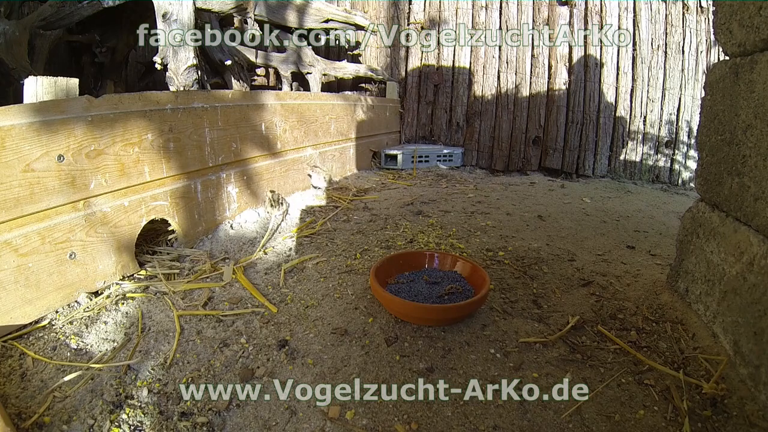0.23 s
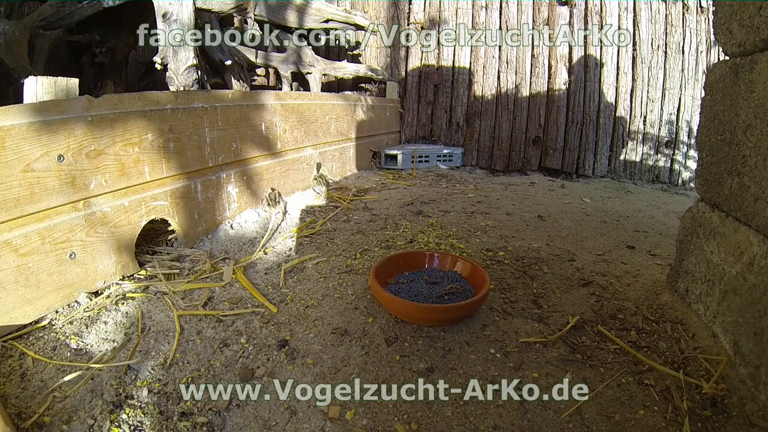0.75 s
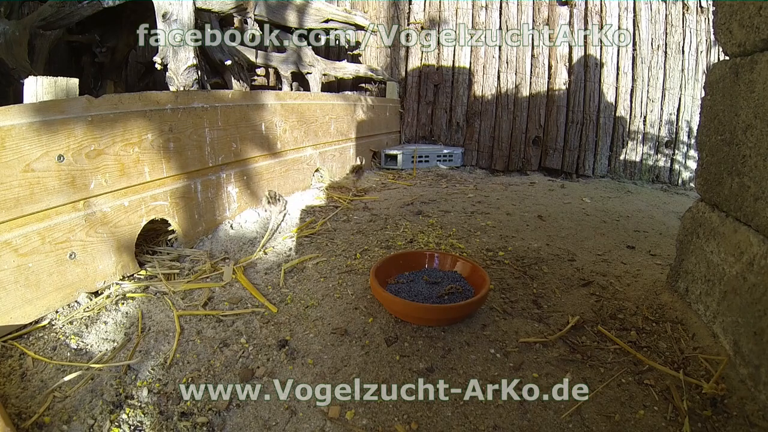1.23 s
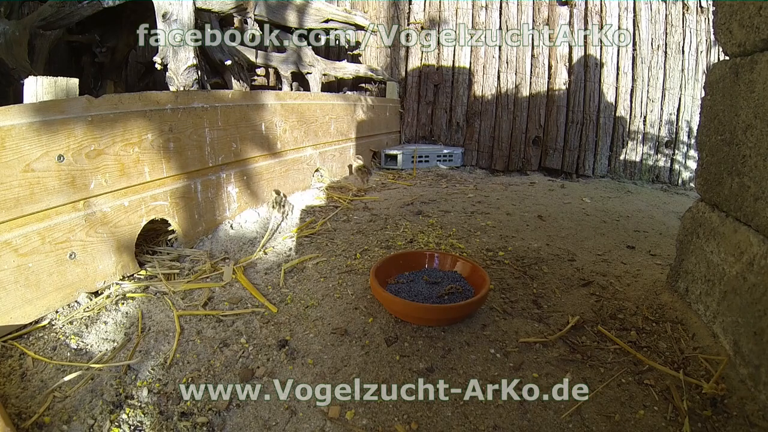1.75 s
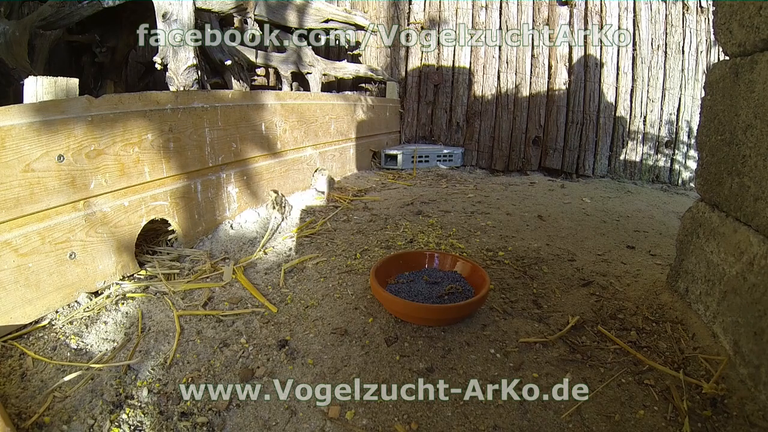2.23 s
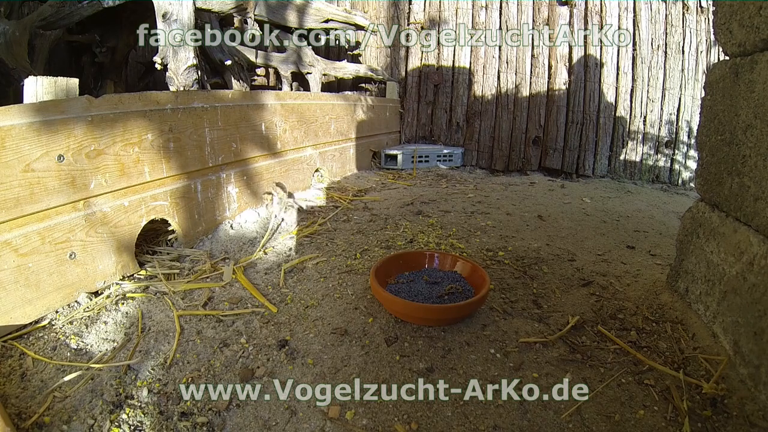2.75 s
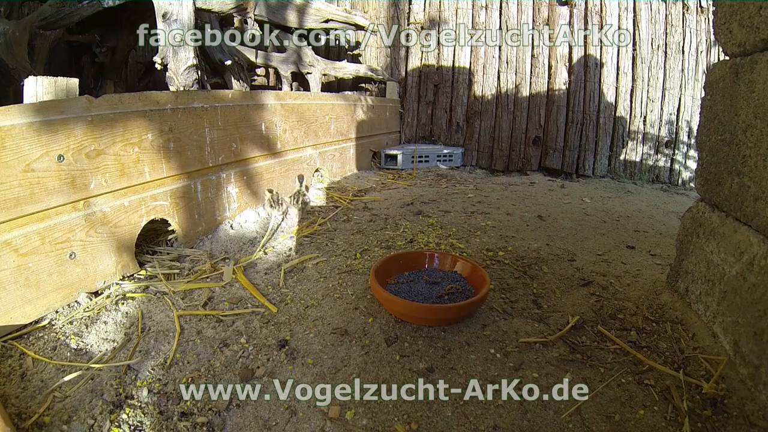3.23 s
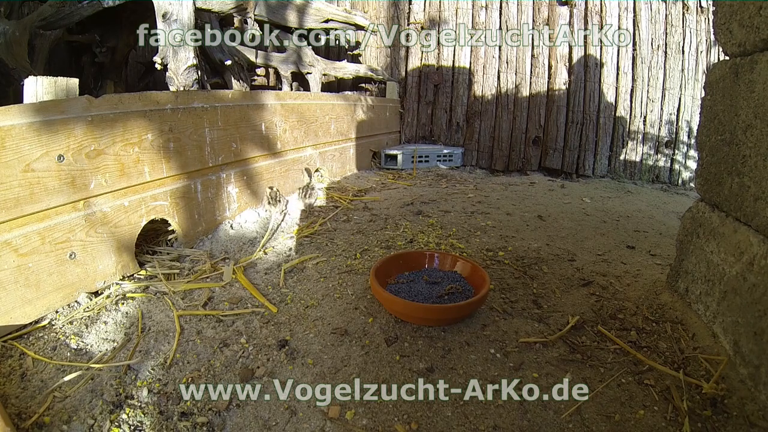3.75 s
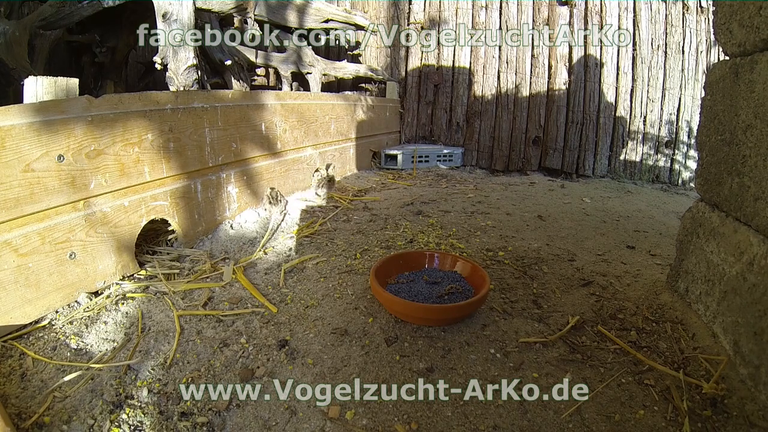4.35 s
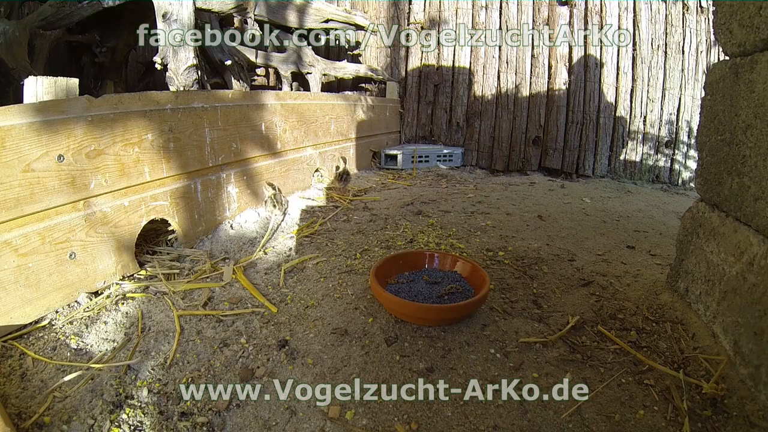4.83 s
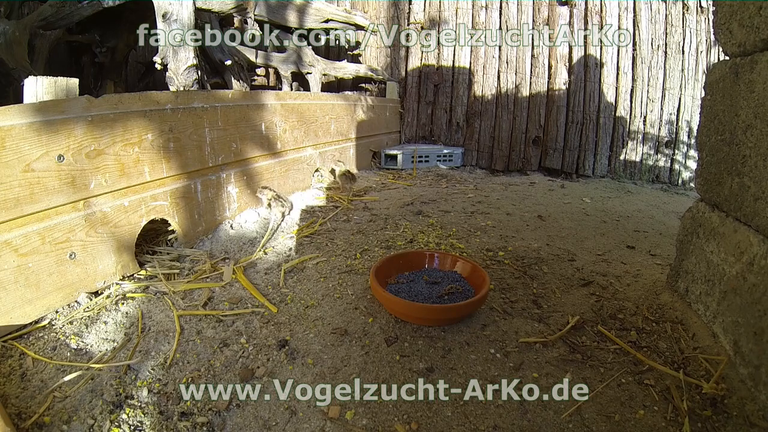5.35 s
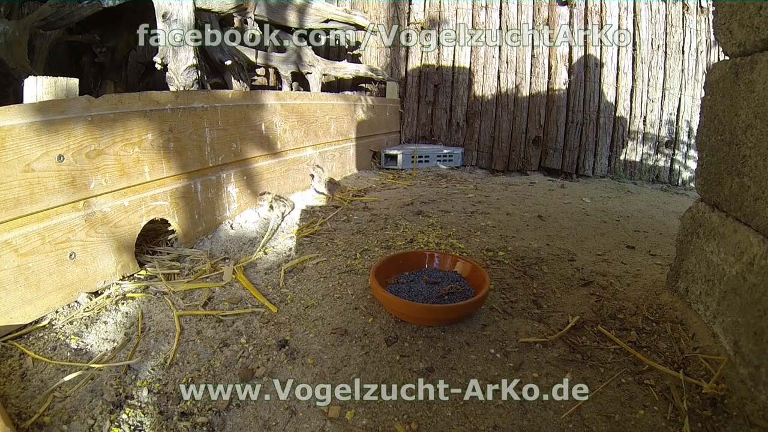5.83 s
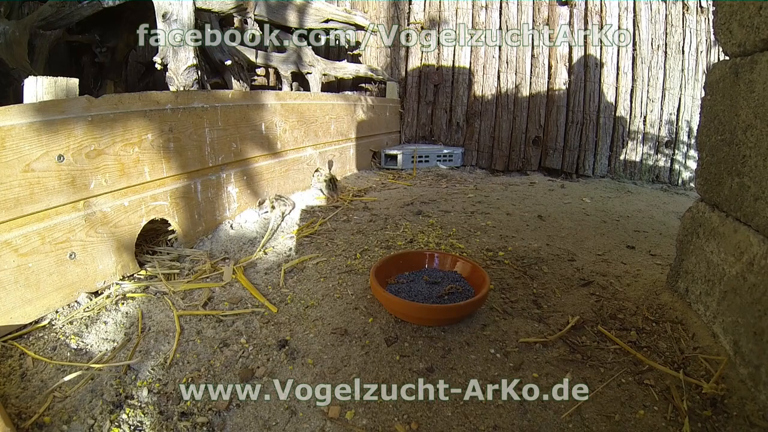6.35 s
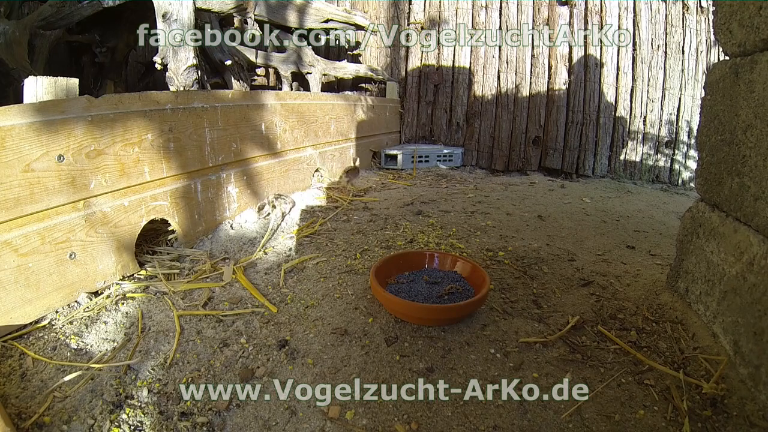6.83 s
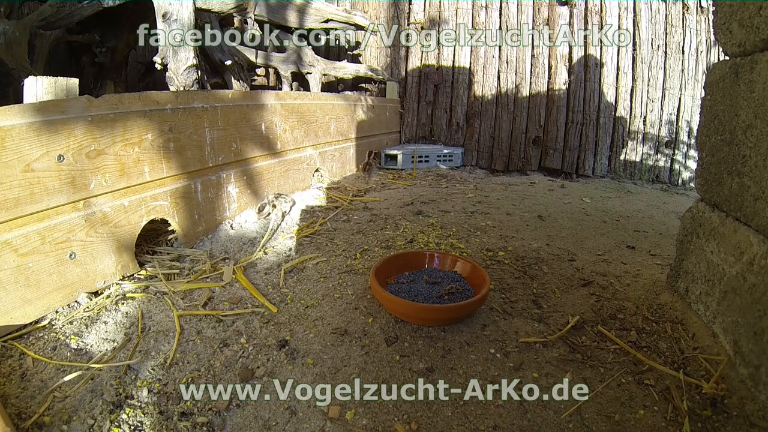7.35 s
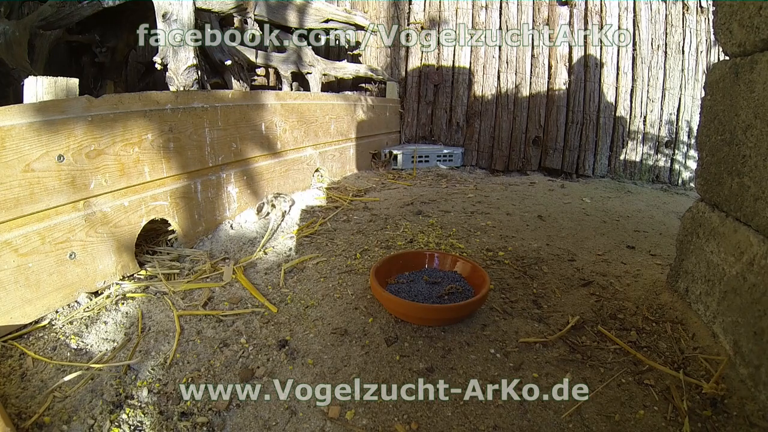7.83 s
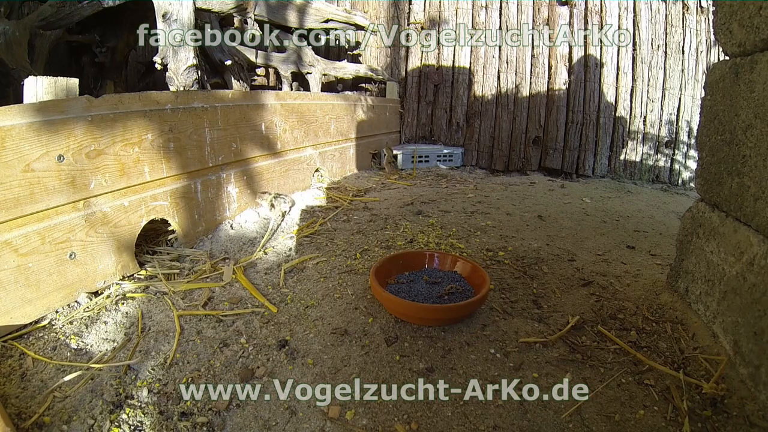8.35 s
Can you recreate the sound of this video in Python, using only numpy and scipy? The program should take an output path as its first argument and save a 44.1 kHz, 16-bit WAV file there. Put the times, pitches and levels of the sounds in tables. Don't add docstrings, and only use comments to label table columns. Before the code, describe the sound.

A quail gives three hoarse, throbbing rise-dip-rise calls in a boarded outdoor pen, with finches trilling and whistling softly over faint traffic rumble.

```python
import sys
import numpy as np
from scipy import signal
from scipy.fft import rfft, irfft, next_fast_len
from scipy.io import wavfile
from scipy.ndimage import uniform_filter1d, map_coordinates

SR = 44100
rng = np.random.default_rng(int(sys.argv[2]) if len(sys.argv) > 2 else 0)


def gain_from_db(level_db):
    decades = np.asarray(level_db, float) / 20
    return 10 ** decades


def int16_out(signal):
    q = np.round(np.clip(np.atleast_2d(signal).T, -1, 1) * 32767)
    wavfile.write(sys.argv[1], SR, q.astype(np.int16))


N = 378819

# freq_hz, level_db (per Hz)
RUMBLE_SPECTRUM = [(8.8, -32), (15, -7), (32, 4), (65, -12.5), (84, -36), (140, -120)]
BODY_SPECTRUM = [(53, -49), (90, -5), (145, -0.5), (172, -12), (215, -7), (253, -24.5), (300, -22),
                 (390, -48.5), (660, -120)]
# time_s, level_db
TRAFFIC_LEVEL = [(0, -41.5), (1.5, -41.5), (1.75, -38.5), (2.1, -42.5), (3.6, -39.5), (5.2, -40.5),
                 (6.9, -42), (8.59, -40)]
# time_s, pitch_hz, level_db
ENGINE_NOTE = [(0.0, 77.87, -48), (0.5, 94.86, -47), (2.7, 98.1, -40.5), (4.69, 90.08, -39.5),
               (5.15, 86.6, -51.5), (5.36, 84.34, -32.5), (6.15, 82, -34), (6.39, 78.03, -45),
               (6.98, 75.03, -37), (7.6, 74.5, -42.5), (8.21, 71.7, -41.5), (8.59, 70.15, -44.5)]
# freq_hz, level_db (per Hz)
AIR_SPECTRUM = [(150, -41), (250, -0.5), (302, -0.5), (335, 2), (359, -4), (622, -11.5), (955, -9),
                (1170, -14.5), (1830, -21), (4410, -35.5), (5230, -34), (9230, -45), (10100, -43.5),
                (13000, -38), (15200, -46)]
# freq_hz, width_hz, level_db
CAMERA_WHINE = [(8500, 30, -96.5), (10020, 360, -81), (12700, 35, -89), (11120, 27, -90.5)]

# start_s, end_s, banded_db, broad_db
RASP_CALLS = [
    (1.352, 1.767, -63, -61.5),
    (3.958, 4.294, -72, -56),
    (6.6, 7.3, -75, -76),
]
# freq_hz, width_hz, level_db
RASP_RESONANCES = [(2450, 70, -3), (3290, 90, -4), (3680, 110, 0), (4170, 100, -2), (4820, 130, -5),
                   (5200, 110, -9)]
# freq_hz, level_db (per Hz)
RASP_AIR = [(700, -46), (1300, 5.5), (3000, -2), (4800, -10), (6800, -36)]

# start_s, level_db, dull_part_db, top_hz
CLAW_STROKES = [(1.755, -61, -29, 14000), (5.5791, -58, 16, 8000), (6.645, -37, -14, 9000),
                (6.715, -39, -16, 14000), (6.876, -50, -20, 14000), (6.9882, -47.5, 3, 14000),
                (7.025, -50, 3, 12000), (7.0698, -47, 2, 12000), (7.1144, -47.5, -6, 13000),
                (7.155, -45, -2, 13000), (7.2659, -46.5, 5.5, 7500)]

# start_s, length_s, start_hz, end_hz, level_db
GURGLE_STEPS = [(6.657, 0.042, 497, 507, -47.5), (6.69, 0.039, 501, 488, -43.5),
                (6.722, 0.075, 340, 490, -39.5), (6.803, .03, 525, 588, -38.5),
                (6.835, 0.031, 647, 670, -47.5), (6.865, 0.025, 766, 780, -36.5)]
# pitch_hz, level_db
CROP_RESONANCE = [(350, -29), (420, -19.5), (480, -4), (560, -9.5), (665, 2), (780, -12.5)]
# freq_hz, level_db
HEN_THROAT = [(3200, 10), (5000, -22)]
# start_s, length_s, start_hz, end_hz, level_db
CROAK_NOTES = [(7.106, 0.027, 3200, 2900, -54.5), (7.136, 0.035, 3550, 3200, -57),
               (7.865, 0.054, 3400, 4300, -69), (6.11, .08, 3400, 5200, -70)]
# peak_s, pitch_hz, peak_db, half_length_ms, glide_hz_per_ms
CLUCK_PIPS = [(.849, 1840, -39, 2.9, 48), (0.859, 2940, -49, 4.4, 5), (0.86, 4480, -49, 3, 5),
              (0.8667, 1990, -38, 1.6, -200), (0.872, 875, -39, 2.5, -60), (.871, 1750, -46, 3, -60),
              (4.897, 1650, -40, 3.2, 70), (4.903, 2120, -38.5, 2, 60), (4.911, 2950, -49, 4.4, 4),
              (4.918, 2050, -41.5, 3.3, -81), (4.925, 835, -34.5, 1.7, -60), (4.931, 1300, -45, 4, -60),
              (4.936, 700, -44, 1.6, -50)]

# start_s, length_s, top_hz, depth_hz, level_db
POINTED_PEEPS = [(5.025, 0.062, 4200, 1100, -52.5), (7.376, 0.052, 4780, 950, -63.5),
                 (7.452, 0.062, 4290, 280, -61), (7.65, 0.052, 4920, 700, -66),
                 (7.868, .085, 4850, 900, -69), (8.04, 0.052, 4570, 550, -65)]
# start_s, length_s, top_hz, depth_hz, level_db
FLAT_TOPPED_PEEPS = [(0.089, 0.078, 4700, 450, -62.5), (5.453, 0.071, 4640, 1100, -62.5),
                     (5.741, 0.078, 4920, 600, -69), (6.013, 0.081, 5000, 623, -67)]
# start_s, length_s, start_hz, end_hz, level_db
HALF_ARCHES = [(2.142, 0.027, 4840, 4430, -70), (2.382, 0.04, 5044, 3840, -57.5),
               (2.967, 0.031, 5000, 3620, -61.5), (5.858, .07, 4950, 3300, -64),
               (7.586, 0.1, 4180, 4470, -58)]
STRAIGHT_CHIPS = [(.2, .04, 3950, 4400, -68), (2.52, .05, 4310, 5310, -71), (7.79, 0.022, 5140, 3230, -56),
                  (8.42, 0.024, 5060, 3180, -51)]
# start_s, length_s, start_hz, end_hz, level_db
RISING_WHISTLES = [
    (0, 0.4, 2653, 3223, -62),
    (4.13, 0.47, 2540, 3363, -60),
    (6.15, 0.44, 2580, 3310, -60.5),
    (7.9, 0.52, 2538, 3253, -61),
]
LEVEL_WHISTLES = [(.24, .14, 8200, 8250, -79), (.235, 0.28, 5000, 5050, -57.5),
                  (4.425, 0.15, 4980, 4900, -62), (8.225, 0.25, 4880, 4830, -54.5)]

# start_s, level_db, second_half_db, stretch, valley_shift_hz
NEAR_TRILL = [(3.9112, -57.5, -14, 0.8, -300), (4.061, -49.5, -3, 0.73, -250),
              (4.1904, -47.5, 2, 0.89, -100), (4.3238, -50, 6, 0.91, 10), (4.456, -44, 1.5, 0.91, 11),
              (4.5894, -44, 1.5, 0.96, 9), (4.726, -43.5, -0.5, 0.91, 8), (4.861, -42.5, -2.5, 1, 30)]
FAR_TRILL = [(0.3544, -55, -1, 0.77, -250), (0.4857, -52, 3, 0.86, -120), (0.6156, -53, 3, 0.94, 10),
             (0.7485, -47.5, -3, 0.9, 10), (0.8764, -48, -5, 0.96, 10)]
# low_hz, top_hz, second_hump_height, attack_s, overtone_db
NEAR_VOICE = (3510, 4320, 0.42, 0.0008, -39)
FAR_VOICE = (3350, 4460, 0.35, 0.011, -35)

# time_s, pitch_hz, level_db
QUAIL_CALLS = [
    [(2.588, 1307, -48.5), (2.62, 1590, -36), (2.662, 2294, -29.5), (2.685, 2726, -24), (2.768, 2880, -26),
     (2.774, 2330, -32), (2.792, 2050, -31), (2.83, 2768, -24.5), (2.85, 2760, -43)],
    [(5.081, 1520, -50), (5.11, 1652, -36), (5.16, 2276, -31), (5.222, 2917, -28), (5.232, 2306, -41),
     (5.246, 1960, -34), (5.289, 1960, -34), (5.297, 2764, -30), (5.32, 2720, -46)],
    [(6.32, 1403, -56), (6.355, 1624, -39), (6.39, 2034, -33), (6.44, 2794, -28), (6.493, 2900, -30.5),
     (6.499, 2300, -35), (6.541, 2077, -32.5), (6.549, 2774, -28), (6.58, 2807, -50)],
]
# time_s, level_db, half_length_ms
THROAT_THROBS = [(2.623, -12, 2.7), (2.656, -6, 2.8), (2.668, 4, 1.8), (2.681, 8, 4), (2.688, -6, 1.5),
                 (2.694, 7, 3.5), (2.703, -9, 3), (2.71, 7, 2.8), (2.72, -10, 4.3), (2.728, 10, 2),
                 (2.735, -12, 3), (2.743, 8.5, 2.5), (2.75, -14, 2.5), (2.756, 8.5, 1.5), (2.765, 9.5, 4),
                 (2.824, 6, 2), (2.834, 12, 3.5), (2.843, -7, 4), (5.138, -2, 2.5), (5.162, 4.5, 2.5),
                 (5.171, -11, 2), (5.18, -6, 2), (5.185, 7, 3), (5.192, 9, 2), (5.202, 1.5, 2.3),
                 (5.209, 6, 2.5), (5.215, -10, 2), (5.222, 5.5, 4), (5.237, -11, 6), (5.251, 4, 3.3),
                 (5.287, 2.5, 3), (5.298, 5, 2), (5.306, 5, 2.5), (6.338, -13, 7), (6.358, 6.5, 2),
                 (6.366, 5.5, 2.5), (6.386, 2, 4), (6.42, 5, 2), (6.438, 3, 2.5), (6.447, 5.5, 2.7),
                 (6.461, 4.5, 3.5), (6.454, -8, 2), (6.471, -15, 5), (6.48, 7, 1.8), (6.486, -18, 2.5),
                 (6.493, 5, 3), (6.521, 4, 5), (6.552, 4.5, 3), (6.567, 7, 2)]
# time_s, spread_s, extra_roughness_db
VOICE_BREAKS = [(2.797, 0.028, 4), (5.268, 0.021, -1.5), (6.525, 0.026, 2)]
# crest_s, rate_hz, depth_share
DIP_WARBLE = [(2.781, 55.1, 0.046), (5.258, 53, .095), (6.516, 69, 0.054)]
# overtone_start_db, overtone_late_rise_db, overtone_top_to_break_db,
# third_partial_db, tilt_db (each higher partial), break_lift_db (higher partials)
BEAK_OPENING = [(-7, -2.5, 1.43, 0, -1, 4), (7.5, -5.5, 4.4, -3, 1, 7), (1, 3.5, 4.5, 3, 1, 10)]
# pitch_hz, level_db
SECOND_PARTIAL = [(1400, -5), (1620, 3), (2050, -9), (2420, -9.5), (2720, -31), (2950, -29)]
THIRD_PARTIAL = [(1300, -22.5), (1620, -11), (2000, -31), (2400, -41), (2900, -44.5)]
# freq_hz, level_db
QUAIL_THROATS = [
    [(5000, -22), (6500, -34), (8500, -49.5), (10000, -58), (11500, -50), (13000, -55), (14300, -42),
     (16000, -66)],
    [(5000, -22), (6500, -39), (8500, -56), (10000, -53), (11000, -43), (12700, -47), (14000, -56),
     (16000, -66)],
    [(5000, -23), (6500, -34), (8500, -50), (10000, -56), (11700, -45), (12600, -56), (13500, -70),
     (16000, -80)],
]

# delay_s, level_db
WALL_ECHOES = [(.0019, -13.5), (.0035, -12.5), (.006, -13), (.0085, -11), (.0118, -17.5), (.0142, -5.5),
               (.0175, -12), (.022, -16), (.026, -17), (.03, -16), (.037, -23), (.046, -17.5)]
# freq_hz, t60_s
PEN_DECAY = [(500, .1), (2200, 0.41), (2800, 0.3), (3300, 0.371), (5000, 0.37), (12000, 0.0551)]


def unit(x):
    return x / np.sqrt(np.mean(x ** 2) + 1e-20)


def along(points, hz):
    f, v = np.transpose(points)
    return np.interp(np.log(hz + 1), np.log(f + 1), v)


def curves(rows):
    s, *cols = np.transpose(rows)
    return [np.interp(np.arange(N) / SR, s, c) for c in cols]


def wobble(rate, size=N):
    knots = rng.standard_normal(int(size * rate / SR) + 4)
    return map_coordinates(knots, [np.arange(size) * rate / SR])


def noise(gain):
    m = next_fast_len(N + 8192)
    spectrum = rfft(rng.standard_normal(m)) * gain(np.fft.rfftfreq(m, 1 / SR))
    return unit(irfft(spectrum, m)[:N])


def glides(rows, peak, rise_db, fall_db, bend=0.99):
    u = np.linspace(0, 1, num=21)
    peak = np.clip(peak, .02, .98)
    rise = -rise_db * (1 - u / peak) ** 2
    fall = -fall_db * ((u - peak) / (1 - peak)) ** 2
    swell_db = np.where(u < peak, rise, fall)
    out = []
    for s, long, a, b, db in rows:
        path = u ** bend if a > b else 1 - (1 - u) ** bend
        out.append(np.transpose([s + long * u, a + (b - a) * path, db + swell_db]))
    return out


def whistle(notes, tilt_db, waver, flutter_db, second_db=-30, count=2, order=-1, speed=150,
            throat=HEN_THROAT, patchy_db=0, lift_db=lambda t: 0):
    out = np.zeros(N + SR)
    for rows in notes:
        s, hz, *levels = np.transpose(rows)
        if len(levels) == 1:
            levels = [levels[0], levels[0] + second_db]
        t = np.arange(s[0], s[-1], 1 / SR)
        size = len(t)
        pitch = np.interp(t, s, hz) * (1 + waver * wobble(speed, size))
        phase = 2 * np.pi * np.cumsum(pitch) / SR
        db = [np.interp(t, s, level) for level in levels]
        last = len(db)
        leader = db[order % last]
        for k in range(last + 1, count + 1):
            db.append(leader + tilt_db * (k - last) + along(throat, k * pitch) + lift_db(t))
        tone = 0
        for k, level in enumerate(db):
            unsteady_db = flutter_db * wobble(120, size) + patchy_db * min(k, 4) * wobble(280, size)
            tone = tone + gain_from_db(level + unsteady_db) * np.sin((k + 1) * phase)
        edge = np.clip(np.minimum(t - s[0], s[-1] - t) / 0.001, 0, 1)
        out[max(round(s[0] * SR), 0):][:size] += np.sqrt(2) * edge * tone
    return out[:N]


def background():
    engine_hz, engine_db = curves(ENGINE_NOTE)
    rumble = gain_from_db(-37.5 + wobble(2.9)) * noise(lambda f: gain_from_db(along(RUMBLE_SPECTRUM, f)))
    body = gain_from_db(0.7 + curves(TRAFFIC_LEVEL)[0]) * noise(lambda f: gain_from_db(along(BODY_SPECTRUM, f)))
    note = np.sqrt(2) * np.sin(2 * np.pi * np.cumsum(engine_hz * (1 + 0.03905 * wobble(12))) / SR)
    throb = noise(lambda f: (f > 60) * (f < 98))
    engine = gain_from_db(engine_db) * unit(gain_from_db(1.5 * wobble(4.5)) * note + .5 * throb)
    wash = gain_from_db(-50 + 0.63 * wobble(11)) * noise(lambda f: gain_from_db(along(AIR_SPECTRUM, f)))
    whine = sum(gain_from_db(db) * noise(lambda f: np.exp(-((f - hz) / width_hz) ** 2))
                for hz, width_hz, db in CAMERA_WHINE)
    return rumble + body + engine + wash + whine


def rasp():
    def bands(f):
        peaks = sum(gain_from_db(db) * w * w / ((f - c) ** 2 + w * w) for c, w, db in RASP_RESONANCES)
        return peaks * (f > 1500) * (f < 5500)

    banded = unit(gain_from_db(1.6 * wobble(60)) * noise(bands))
    broad = unit(gain_from_db(2.0 * wobble(34.98)) * noise(lambda f: gain_from_db(along(RASP_AIR, f))))
    t = np.arange(N) / SR
    out = 0
    for start, end, banded_db, broad_db in RASP_CALLS:
        gate = np.clip(np.minimum((t - start) / 0.018, (end - t) / 0.031), 0, 1)
        out = out + gate * (gain_from_db(banded_db) * banded + gain_from_db(broad_db) * broad)
    return out


def scratches():
    out, t = np.zeros(N + SR), np.arange(SR // 10) / SR
    dull = signal.butter(2, [1500, 4000], "bandpass", fs=SR, output="sos")
    crack = (1 - np.exp(-t / 0.0014)) * (gain_from_db(-60 * t / 0.026) + 0.17 * gain_from_db(-60 * t / 0.11))
    for s, db, dull_db, top_hz in CLAW_STROKES:
        bright = signal.butter(2, [4000, top_hz], "bandpass", fs=SR, output="sos")
        grit = rng.standard_normal(len(t)) * crack
        stroke = signal.sosfilt(bright, grit) + gain_from_db(dull_db + 6.5) * signal.sosfilt(dull, grit)
        out[round(s * SR):][:len(t)] += gain_from_db(db - 8.0) * stroke
    return out[:N]


def hen():
    t = np.arange(N) / SR
    puff = 0.15 * noise(lambda f: (f > 700) * (f < 3800) / (f + 500))
    pips = 0
    for s, hz, db, ms, glide in CLUCK_PIPS:
        after = t - s
        tone = np.sin(2 * np.pi * (hz + 500 * glide * after) * after)
        pips = pips + gain_from_db(db) * np.exp(-(after * 1000 / ms) ** 2) * (tone + puff)
    croaks = whistle(glides(CROAK_NOTES, 0.39, 7.3, 12), tilt_db=0, waver=0.045, flutter_db=5.5, speed=410)
    steps = [np.c_[rows, rows[:, 2] + along(CROP_RESONANCE, rows[:, 1])]
             for rows in glides(GURGLE_STEPS, 0.19, 12, 9.2)]
    gurgle = whistle(steps, tilt_db=-23.5, waver=0.018, flutter_db=3.0, count=4)
    return gurgle + croaks + gain_from_db(1.5) * pips


def finches():
    u = np.linspace(-1, 1, num=15)
    short = []
    for rows, lean, flat in [(POINTED_PEEPS, .8, 2.4), (FLAT_TOPPED_PEEPS, 1.05, 3.6)]:
        arch = np.abs(u) ** flat
        for s, long, top, deep, db in rows:
            short.append(np.transpose([s + long * ((u + 1) / 2) ** lean, top - deep * arch, db - 6 * arch]))
    short += glides(HALF_ARCHES, 0.61, 3.8, 6, bend=2.6) + glides(STRAIGHT_CHIPS, .4, 5.6, 11)
    share = np.linspace(0, 1, num=21)
    ring_db = 0.5 - 7 * ((share - .56) / (2 * 0.097)) ** 2
    slides = [np.c_[rows, rows[:, 2] + ring_db, rows[:, 2] + ring_db - 22]
              for rows in glides(RISING_WHISTLES, 0.28, 11, 14, bend=1.6)]
    joined_db = 8
    slides[0][:, 2:] += np.linspace(joined_db, 0, num=21)[:, None] ** 3 / joined_db ** 2
    peeps = whistle(short, tilt_db=0, waver=.007, flutter_db=3.5)
    level = whistle(glides(LEVEL_WHISTLES, 0.21, 23, 28), tilt_db=0, waver=0.004, flutter_db=3.0)
    rising = whistle(slides, tilt_db=0, waver=0.012, flutter_db=4.0, speed=220)
    return peeps + level + rising


def trill():
    first_s, second_s = .039, .033
    s = np.linspace(0, first_s + second_s, num=36)
    late = s > first_s
    hump = np.abs(np.sin(np.pi * np.where(late, (s - first_s) / second_s, (s / first_s) ** 0.81)))
    valley_db = 4.5 * np.exp(-((s - first_s - .002) / 0.0046) ** 2) - 1.9 * late
    hook_hz, hook_s = 170, .003
    hook = hook_hz * (np.exp(-s / hook_s) + np.exp((s - s[-1]) / hook_s))
    syllables = []
    for rows, voice in [(NEAR_TRILL, NEAR_VOICE), (FAR_TRILL, FAR_VOICE)]:
        low, top, second, attack, over_db = voice
        height = np.where(late, second * hump, hump ** 0.9)
        shape_db = valley_db - 14 * np.exp(-s / attack)
        for at, db, late_db, long, shift in rows:
            hz = low + (top - low) * height + shift * np.clip(s / first_s, 0, 1) ** 3 - hook
            level = db - 3 + shape_db + (s > .03) * late_db
            overtone = level + 1.1 * (db + 42.0) + over_db + 16 * height
            syllables.append(np.transpose([at - .003 + s * long, hz, level, overtone]))
    return whistle(syllables, tilt_db=0, waver=0.009, flutter_db=2.5)


def quail():
    t = np.arange(N) / SR
    throb_db = sum(db * np.exp(-((t - s) * 1000 / ms) ** 2) for s, db, ms in THROAT_THROBS)
    crack_db = sum(db * np.exp(-((t - s) / wide) ** 4) for s, wide, db in VOICE_BREAKS)
    hoarse_db = 1.43 * wobble(260) + crack_db * wobble(450)
    voice = 0
    for rows, beak, (dip, wide, _), warble, throat in zip(
            QUAIL_CALLS, BEAK_OPENING, VOICE_BREAKS, DIP_WARBLE, QUAIL_THROATS):
        start_db, top_db, late_db, third_db, tilt_db, break_db = beak
        crest, rate, deep = warble
        s, hz, db = np.transpose(rows)
        at = np.arange(s[0], s[-1], 1 / 1000)
        in_dip = np.exp(-((at - dip) / wide) ** 4)
        open_db = np.interp(at, [s[0], dip - 4.2 * wide, dip - 2 * wide], [start_db, top_db, late_db])
        pitch, level = np.interp(at, s, hz), np.interp(at, s, db)
        level = level - 9 * np.clip(np.abs(np.gradient(pitch)) / 30 - 1, 0, 1)
        other_hz = 1.16 * np.interp(dip, s, hz) + 0 * at
        other_fade_db = 30 * np.minimum(((at - dip + .002) / (1.04 * wide)) ** 6, 4)
        other_db = np.interp(dip, s, db) - 9 - other_fade_db
        sides = []
        for f, first_db in [(pitch, level), (other_hz, other_db)]:
            crack = .025 * wobble(160 * SR / 1000, size=len(at))
            swing = deep * np.cos(2 * np.pi * rate * (at - crest)) + crack
            second = first_db + open_db + along(SECOND_PARTIAL, f)
            third = first_db + third_db + along(THIRD_PARTIAL, f)
            sides.append(np.transpose([at, f * (1 + in_dip * swing), first_db, second, third]))
        voice = voice + whistle(sides, tilt_db=tilt_db, waver=.014, flutter_db=1.4, count=9, order=0,
                                speed=260, throat=throat, patchy_db=1.7,
                                lift_db=lambda t: break_db * np.exp(-((t - dip) / wide) ** 4))
    return gain_from_db(throb_db + hoarse_db) * voice


def walls(x):
    return sum((-1) ** k * gain_from_db(db) * np.pad(x, (round(s * SR), 0))[:N]
               for k, (s, db) in enumerate(WALL_ECHOES))


def pen(x, delay):
    hz, t, z = signal.stft(rng.standard_normal(SR // 2), SR, nperseg=256)
    decay = gain_from_db(-60 * t / along(PEN_DECAY, hz)[:, None])
    tail = signal.istft(z * decay, SR, nperseg=256)[1]
    late = np.pad(x, (round(delay * SR), 0))
    return signal.fftconvolve(late, tail / np.linalg.norm(tail))[:N]


def scene():
    far_air = background() + rasp()
    small = hen() + scratches()
    thin, wavy, near = finches(), trill(), quail()
    echoing = near + gain_from_db(-5.0) * wavy + gain_from_db(-6.5) * thin + gain_from_db(-6.5) * small
    room = walls(echoing) + gain_from_db(-20.5) * pen(echoing, delay=0.011)
    return (near + wavy + thin + small + room + far_air)[None]


def roll_off(x):
    return signal.sosfilt(signal.butter(12, 15340, fs=SR, output="sos"), x)


def record(dry):
    edge_hz, top_hz = 13900, 14950
    hz, t, z = signal.stft(dry, SR, nperseg=1024)
    top_db = 10 * np.log10(np.mean(np.abs(z[0, hz > edge_hz]) ** 2, axis=0) + 1e-20)
    drift = unit(wobble(22)[np.minimum(t * SR, N - 1).astype(int)])
    mood = drift + (top_db - np.median(top_db)) / 3
    grain = rng.standard_normal(z.shape[1:])
    patches = unit(uniform_filter1d(uniform_filter1d(grain, size=5, axis=0), size=4, axis=1))
    below_edge = hz[:, None] < edge_hz + 350 * np.clip(mood, -2.5, .6)
    below_top = hz[:, None] < top_hz + 120 * np.minimum(mood, 2)
    keep = below_edge | ((patches + 1.1 * mood - .1 > 0) & below_top)
    kept = signal.istft(z * np.where(keep, 1, gain_from_db(-27)), SR, nperseg=1024)[1][:, :N]
    return roll_off(kept)


dry = scene()
out = record(dry)
int16_out(out)
```